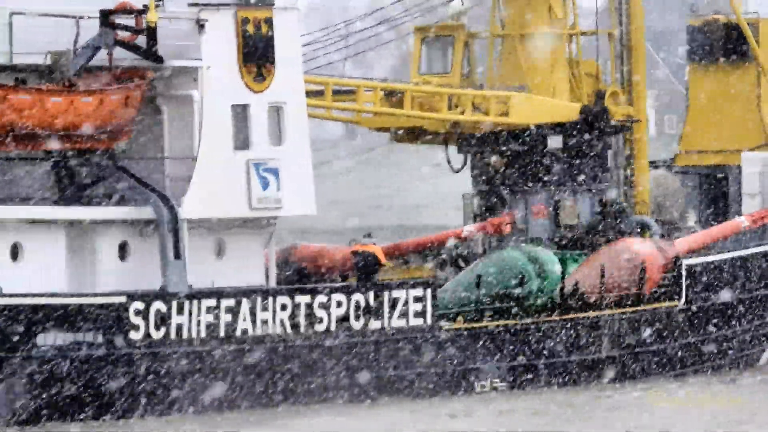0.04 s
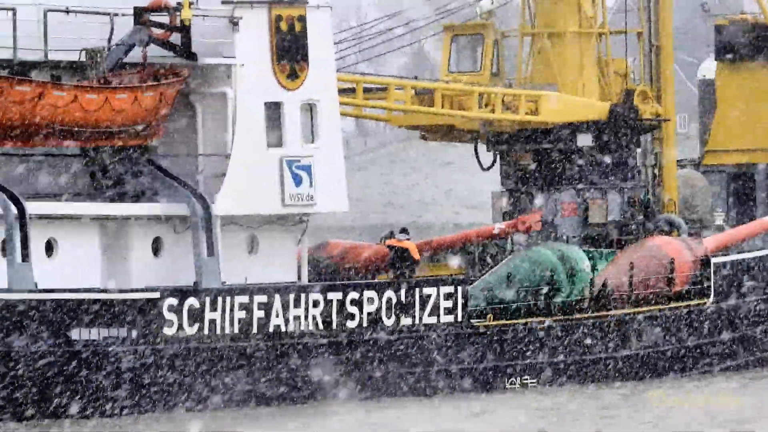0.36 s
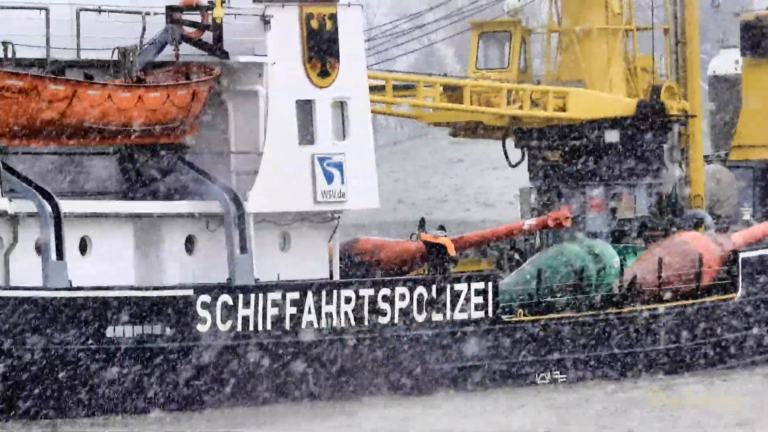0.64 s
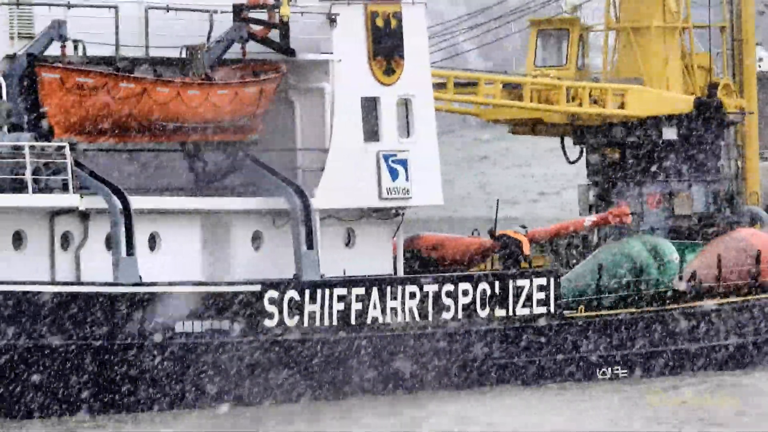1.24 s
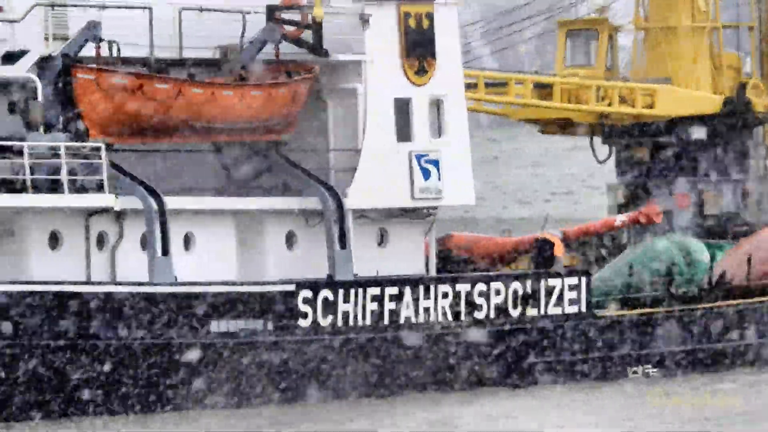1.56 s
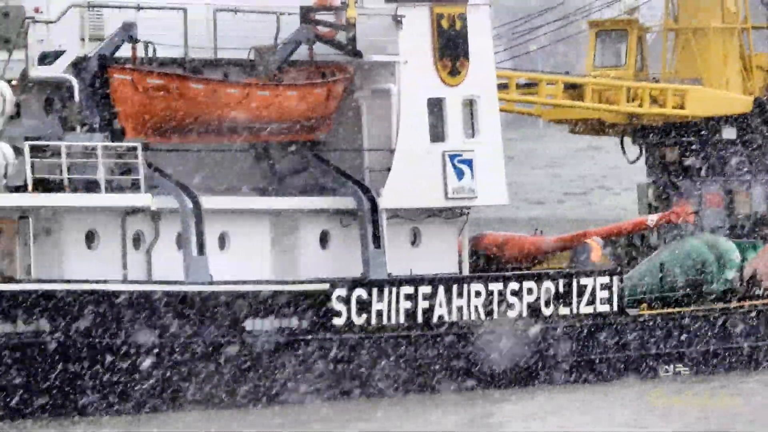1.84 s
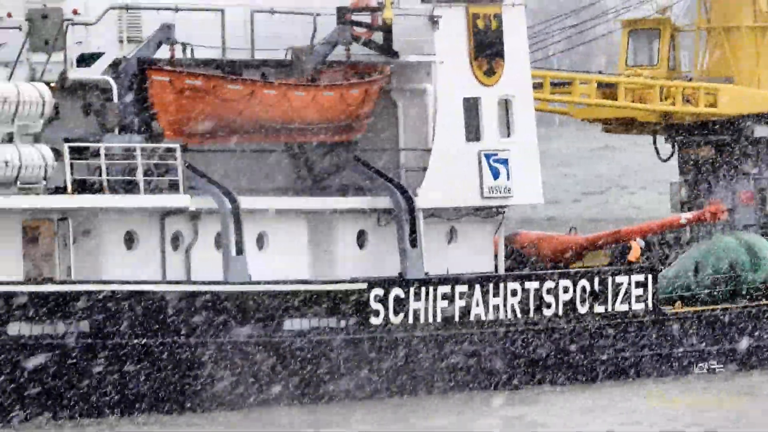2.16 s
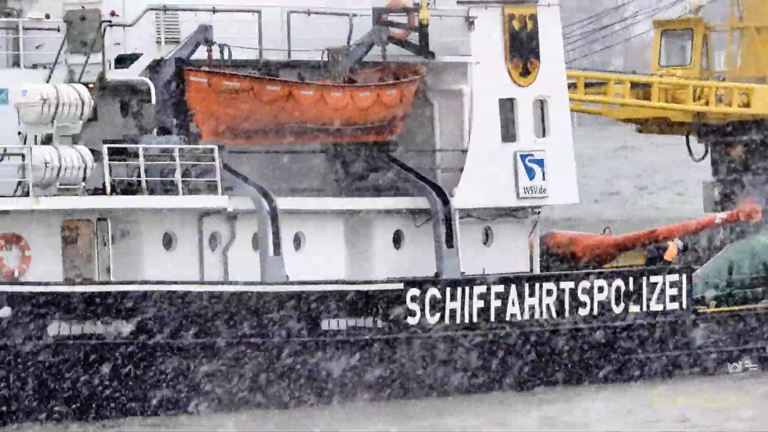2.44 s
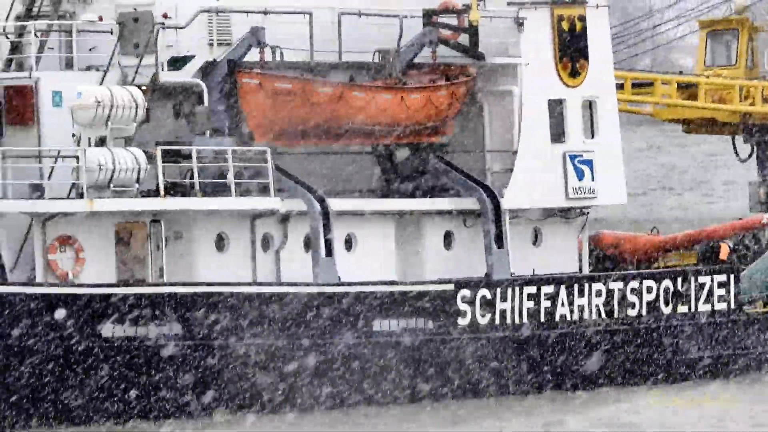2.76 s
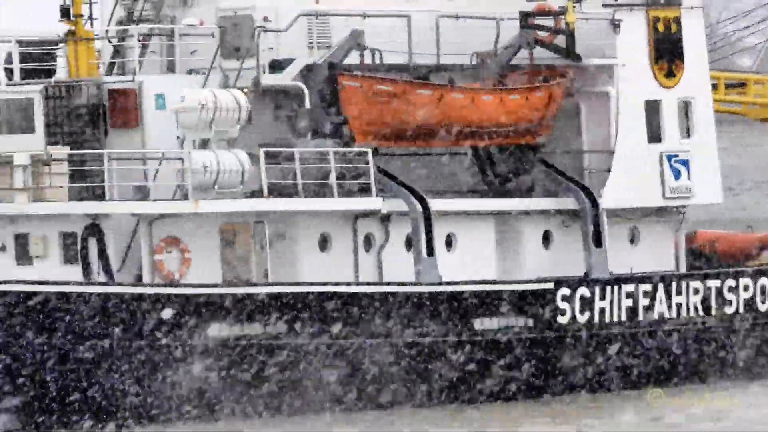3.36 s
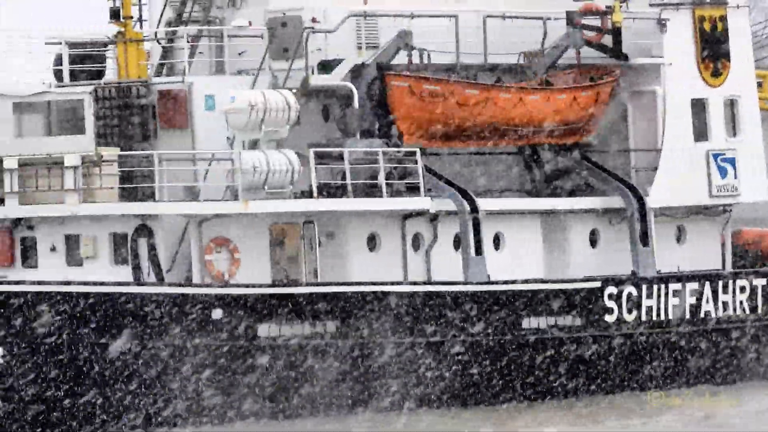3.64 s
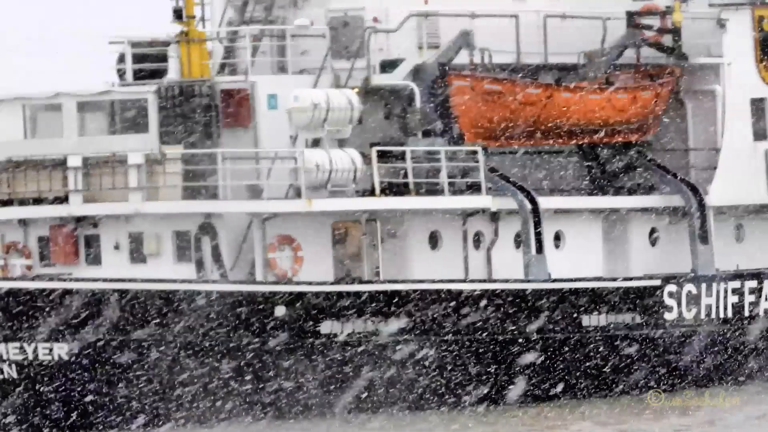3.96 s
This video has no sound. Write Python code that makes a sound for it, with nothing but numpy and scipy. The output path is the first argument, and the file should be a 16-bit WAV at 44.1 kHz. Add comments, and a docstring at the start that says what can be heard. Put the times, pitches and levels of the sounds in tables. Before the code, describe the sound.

Gusty wind rumbles and slaps against the microphone, with soft snow hiss behind it.

```python
"""Strong wind buffets a microphone at a harbour in driving snow, while a ship slides past.
Eddies shake the microphone with a deep rumble; the fastest tear into short, brighter flurries and slaps,
and gusts draw hollow hoots from the housing. Behind them lie the ship's dull wash and a soft rush of
wind over water that swells and sinks. Snow hisses, and icy grains tick on the housing.
A quick limiter holds down the hardest buffets."""
import sys
import numpy as np
from scipy import signal
from scipy.fft import rfft, irfft
from scipy.io import wavfile
from scipy.ndimage import uniform_filter1d

SR = 44100
rng = np.random.default_rng(int(sys.argv[2]) if len(sys.argv) > 2 else 0)


def master_out(mix):
    """Clip the mix to full scale and print it as 16-bit PCM to the path in sys.argv[1]."""
    frames = np.transpose(np.atleast_2d(mix))
    ceiling = np.clip(frames, -1, 1)
    pcm = np.round(ceiling * 32767).astype(np.int16)
    wavfile.write(sys.argv[1], SR, pcm)


N = 176400


def amp(db):
    """Decibels to gain."""
    return 10 ** (np.asarray(db) / 20)


def unit(x):
    """Scales to rms 1."""
    return x / np.sqrt(np.mean(x ** 2) + 1e-20)


def fader(points):
    """Gain at every sample from (t/s, level/dB) points."""
    return amp(np.interp(np.arange(N) / SR, *np.transpose(points)))


def colour(x, points, shift=1):
    """EQ through (f/Hz, level/dB) points, their frequencies times shift; steep beyond both ends."""
    f, db = np.transpose(points)
    hz = np.maximum(np.fft.rfftfreq(len(x), 1 / SR) / shift, 1)
    curve = amp(np.interp(np.log(hz), np.log(f), db))
    skirts = np.minimum(hz / f[0], 1) ** 2 * np.minimum(f[-1] / hz, 1) ** 6
    return irfft(rfft(x) * curve * skirts, len(x))


def lowpass(x, hz, order):
    """Smooth low-pass without delay."""
    f = np.fft.rfftfreq(len(x), 1 / SR)
    return irfft(rfft(x) / (1 + (f / hz) ** (2 * order)), len(x))


def wander(rate_hz, size):
    """Random modulation of rms 1, rolled off above the rate."""
    return unit(lowpass(rng.standard_normal(size), rate_hz, order=2))


def steadied(x, seconds):
    """Irons the slow swells out of a noise, leaving it near rms 1."""
    power = lowpass(x ** 2, 1 / (2 * seconds), order=1)
    return x / np.sqrt(np.abs(power) + 1e-12)


def impulses(levels_db, per_s):
    """Randomly timed one-sample spikes of either polarity."""
    return amp(levels_db) * rng.choice([-1, 1], N) * (rng.random(N) < per_s / SR)


def patchy(x, depth_db=3, patch_hz=600, patch_s=0.03):
    """Makes a hiss flicker in patches of time and pitch, at rms 1."""
    spectra = signal.stft(x, nperseg=512)[2]
    bins = len(spectra)
    flicker = rng.standard_normal(spectra.shape)
    flicker = uniform_filter1d(flicker, round(patch_hz * 2 * bins / SR), axis=0)
    flicker = uniform_filter1d(flicker, round(patch_s * SR / bins), axis=1)
    return unit(signal.istft(spectra * amp(depth_db * unit(flicker)))[1][:N])


def gust_envelope(t, length, attack_s=0.0056, release_s=0.0034):
    """Quick attack, hold and quick release."""
    ramps = np.clip(t / attack_s, 0, 1) * np.clip((length - t) / release_s, 0, 1)
    return np.sin(np.pi / 2 * ramps) ** 2


def add(mix, start_s, sound):
    """Mixes a sound in at its cue."""
    part = mix[max(round(start_s * SR), 0):][:len(sound)]
    part += sound[:len(part)]


# Fader ride of the buffeting wind: t/s, level/dB
RUMBLE_RIDE = [(0.0, -23.5), (0.03, -27.5), (0.08, -21.5), (0.12, -33.5), (0.14, -23), (0.5, -24),
               (0.52, -19), (0.54, -33.5), (0.6, -26), (0.96, -26), (1.0, -31), (1.05, -30.5),
               (1.07, -23.5), (1.51, -25), (1.56, -22.5), (1.74, -28.5), (1.88, -25), (1.95, -28.5),
               (2.28, -25), (2.32, -32.5), (2.49, -26), (2.58, -23.5), (2.63, -23.5), (3.27, -23.5),
               (3.35, -30.5), (3.39, -28.5), (3.69, -24), (4.0, -28.5)]
# Bass-heavy EQ of the rumble: f/Hz, level/dB
RUMBLE_EQ = [(18, -17.5), (28, -5.5), (43, 1), (70, -1), (110, -4), (170, -7.5), (260, -11), (340, -22),
             (420, -26), (540, -32.5), (700, -40), (1000, -54.5)]
# Boost or cut of its sub-bass: t/s, level/dB
SUB_RIDE = [(0.0, 0), (0.7, -5.5), (1.3, -3.5), (1.65, -4.5), (1.9, 5.5), (2.28, 1), (2.6, -1), (3.3, -1),
            (3.9, 2)]


def rumble(flutter_db=1.5, flurry_lift_db=1.5, trim_db=3):
    """Turbulent pressure shakes the microphone; the upper band flutters as small eddies pass."""
    air = colour(rng.standard_normal(N), RUMBLE_EQ)
    lows = lowpass(air, hz=310, order=3)
    flutter = unit(amp(flutter_db * wander(rate_hz=42, size=N)))
    air = steadied(lows + (air - lows) * flutter, seconds=0.085)
    air += (fader(SUB_RIDE) - 1) * lowpass(air, hz=61.5, order=2)
    in_flurry = np.zeros(N)
    for start, length, _, _ in FLURRY_CUES:
        add(in_flurry, start, gust_envelope(np.arange(0, length, 1 / SR), length))
    lift_db = flurry_lift_db * lowpass(in_flurry, hz=30, order=2)
    return amp(trim_db + lift_db) * fader(RUMBLE_RIDE) * air


# Dark EQ of the ship's wash: f/Hz, level/dB
SHIP_EQ = [(150, 5.5), (500, -1.5), (800, -5.5), (1150, -10), (1500, -19.5), (2500, -30)]


def ship(level_db=-46.5):
    """Engine and bow wash blur into one even, dull bed at this distance."""
    return amp(level_db) * unit(colour(rng.standard_normal(N), SHIP_EQ))


# Swells of the distant rush: t/s, level/dB
RUSH_RIDE = [(0.03, -65), (0.34, -66), (0.37, -68), (0.66, -56), (0.73, -61), (0.85, -56), (1.05, -57.5),
             (1.09, -62.5), (1.59, -62.5), (1.61, -68.5), (1.85, -56), (1.86, -61), (2.29, -62.5),
             (2.54, -50.5), (2.56, -57), (2.79, -66.5), (2.9, -62), (3.31, -70), (3.52, -58), (3.69, -55.5),
             (3.71, -59), (3.82, -58.5), (3.97, -58.5)]
# Its soft midrange EQ: f/Hz, level/dB
RUSH_EQ = [(400, -6.5), (800, -4), (1300, -1.5), (2000, -2.5), (2900, -6.5), (4000, -12.5), (6000, -21.5),
           (8000, -45)]


def rush(ripple_db=1.0, trim_db=1.5):
    """Distant wind over the water swells and sinks, with a fast ripple in its level."""
    ripple = amp(ripple_db * wander(rate_hz=39, size=N))
    air = unit(colour(rng.standard_normal(N), RUSH_EQ))
    return amp(trim_db) * fader(RUSH_RIDE) * ripple * air


# Fader ride of the driving snow: t/s, level/dB
SNOW_RIDE = [(0.03, -73), (0.28, -76), (0.54, -79), (0.65, -76), (1.04, -77.5), (1.1, -72.5), (1.59, -73.5),
             (1.61, -78), (1.74, -70.5), (2.19, -71), (2.34, -78), (2.43, -73), (2.59, -76.5), (3.04, -73),
             (3.26, -83), (3.51, -70), (3.87, -67.5), (3.97, -71.5)]
# Its thin, bright EQ: f/Hz, level/dB
SNOW_EQ = [(1500, -9.5), (3000, 0.5), (4200, -.5), (5600, -2), (6800, -3), (7600, -8), (8100, -14),
           (8600, -23), (11000, -26.5), (15000, -29.5)]


def snow(spread_db=5, grains_db=-9, trim_db=8):
    """Driving snow: a fine hiss with countless tiny impacts in it."""
    grains = impulses(spread_db * np.minimum(rng.exponential(1, N), 4), per_s=300)
    patter = rng.standard_normal(N) + amp(grains_db) * unit(grains)
    return amp(trim_db) * fader(SNOW_RIDE) * patchy(colour(patter, SNOW_EQ))


# Low-mid EQ of an eddy, for puffs and flurries alike: f/Hz, level/dB
EDDY_EQ = [(90, -15.5), (200, 2.5), (280, 3), (450, -3), (600, -8.5), (700, -14), (850, -20.5),
           (1000, -29.5), (1400, -38.5), (2200, -59)]


def puffs(level_db=-41, spread_db=2.5):
    """Tiny eddies pop against the microphone at random."""
    pops = impulses(spread_db * rng.uniform(-2.1, 1, N), per_s=22)
    return amp(level_db) * unit(colour(pops, EDDY_EQ))


# Top-end EQ of fine ice flecks and of the microphone's hiss: f/Hz, level/dB
SPATTER_EQ = [(4000, 0.5), (7000, 0), (9000, -1), (12000, -8.5), (15000, -20)]


def spatter(clicks_db=-85.5, spread_db=4, mic_hiss_db=-88):
    """Flecks of ice click on the housing, over a faint, steady high hiss of the microphone."""
    flecks = impulses(spread_db * rng.uniform(-0.83, 1, N), per_s=40)
    clicks = unit(colour(flecks, SPATTER_EQ))
    mic_hiss = patchy(colour(rng.standard_normal(N), SPATTER_EQ))
    return amp(clicks_db) * clicks + amp(mic_hiss_db) * mic_hiss


# Fast eddies tearing at the microphone: t/s, length/s, level/dB, EQ shift/octaves
FLURRY_CUES = [(0.236, 0.038, -26.5, -0.13), (0.498, 0.017, -31.5, 0.083), (0.535, 0.022, -25.5, -0.083),
               (0.691, 0.034, -18.5, 0.066), (0.722, 0.044, -23.5, -0.23), (0.767, 0.024, -20, -0.36),
               (.807, 0.052, -23.5, -0.27), (0.906, 0.034, -23, -0.035), (0.981, 0.024, -30.5, 0.59),
               (1.027, 0.015, -19, -0.0052), (1.258, 0.016, -19.5, -1.01), (1.532, 0.038, -20, -0.77),
               (1.841, 0.062, -28, 0.23), (1.925, 0.049, -36, 0.3), (1.975, 0.068, -29, 0.17),
               (2.132, 0.053, -35, 0.23), (2.192, 0.037, -27.5, -0.3), (2.258, 0.01, -31, 0.05),
               (2.283, 0.017, -32, 0.11), (2.465, 0.016, -28, -0.3), (2.546, 0.03, -20.5, 0.24),
               (2.58, 0.02, -19.5, 0.55), (2.597, 0.017, -23, 0.05), (2.627, 0.062, -24, -0.48),
               (3.385, 0.066, -31, 0.38), (3.677, 0.031, -28.5, 0.24), (3.756, 0.044, -29, 0.35),
               (3.791, 0.039, -27, 0.57), (3.883, 0.057, -26.5, 0.34), (3.937, 0.076, -28.5, 0.25)]


def flurries(tear_db=3.5, sag_db=-6.5, trim_db=0.5):
    """Each fast eddy is a short, ragged burst that hits at once and sags."""
    out, size = np.zeros(N), 2 ** 13
    t = np.arange(size) / SR
    for start, length, db, octaves in FLURRY_CUES:
        air = colour(rng.standard_normal(size), EDDY_EQ, shift=2 ** octaves)
        tear = amp(tear_db * wander(rate_hz=134, size=size))
        burst = steadied(air * tear, seconds=0.054)
        envelope = gust_envelope(t, length) * amp(sag_db * np.minimum(t / length, 1))
        add(out, start, amp(db + trim_db) * envelope * burst)
    return out


# Hits of the larger snow grains: t/s, peak level/dB, f/Hz, width/octaves
TICK_CUES = [(.513, -64, 7650, 0.48), (1.915, -54.5, 6800, 0.15), (2.319, -46, 4750, 0.26),
             (2.433, -62, 7200, .18), (2.504, -40, 3700, .33), (3.84, -51, 7100, 0.16),
             (3.871, -47, 4800, .35), (3.906, -55, 7100, .16)]


def ticks(attack_s=0.0012, decay_s=0.0047):
    """Icy grains strike the housing: a dry, narrow-band tick each."""
    out, size = np.zeros(N), 2 ** 10
    t = np.arange(size) / SR
    hz = np.fft.rfftfreq(size, 1 / SR) + 1
    envelope = np.minimum(t / attack_s, 1) * np.exp(-np.maximum(t - attack_s, 0) / decay_s)
    for start, db, centre_hz, octaves in TICK_CUES:
        band = np.exp(-0.5 * (np.log2(hz / centre_hz) / octaves) ** 2)
        tick = envelope * irfft(rfft(rng.standard_normal(size)) * band)
        add(out, start, amp(db) * tick / np.abs(tick).max())
    return out


# Single eddies slapping the microphone: centre t/s, level/dB, f/Hz
SLAP_CUES = [(0.7032, -27, 374), (0.7758, -15, 280), (0.9226, -14.5, 227), (0.9394, -12, 300),
             (0.985, -8.5, 336), (1.044, -8.5, 338), (1.5384, -21, 280), (2.0015, -20, 553),
             (2.1232, -15.5, 380), (2.14, -22.5, 279), (2.2014, -14.5, 423), (2.288, -25, 300),
             (2.5757, -5, 397), (2.639, -15, 280), (3.7645, -21, 440), (3.8433, -9.5, 380),
             (3.9229, -17, 470), (3.9415, -19, 400)]


def slaps(width_cycles=0.33, trim_db=-1.5):
    """A single eddy is one quick push and pull of the air."""
    out, t = np.zeros(N), np.arange(-0.015, 0.015, 1 / SR)
    for centre, db, hz in SLAP_CUES:
        swing = np.cos(2 * np.pi * (hz * t + rng.random())) / np.cosh(hz * t / width_cycles)
        add(out, centre + t[0], amp(db + trim_db) * swing)
    return out


# Hollow hoots of the housing: t/s, length/s, level/dB, f/Hz
HOOT_CUES = [(0.986, 0.021, -24, 464), (1.853, 0.033, -30, 492), (1.925, 0.023, -29, 466),
             (1.978, 0.03, -30, 587), (2.199, 0.012, -28.5, 483), (2.548, 0.016, -22, 501)]


def hoots(waver=0.1, trim_db=-4.5):
    """A gust crosses the hollow of the housing, which resonates for a few unsteady cycles."""
    out = np.zeros(N)
    for start, length, db, hz in HOOT_CUES:
        t = np.arange(0, length, 1 / SR)
        pitch = hz * (1 + waver * wander(rate_hz=120, size=8192)[:len(t)])
        tone = np.sin(2 * np.pi * (np.cumsum(pitch) / SR + rng.random()))
        add(out, start, amp(db + trim_db) * unit(gust_envelope(t, length) * tone))
    return out


def scene():
    """Mono mix: wind on the microphone up front; ship, rush and snow behind; close detail on top."""
    wind = rumble() + flurries()
    backdrop = ship() + rush() + snow()
    detail = ticks() + puffs() + slaps() + hoots() + spatter()
    return (wind + backdrop + detail)[None]


def record(dry, threshold_db=-10, ratio=11, release_db_per_s=152.5, cutoff_hz=15700):
    """A quick limiter holds down the hardest buffets; then click-free ends and a high cut."""
    t = np.arange(N) / SR
    peak_db = 20 * np.log10(np.abs(dry[0]) + 1e-9)
    fall_db = t * release_db_per_s
    envelope_db = np.maximum.accumulate(peak_db + fall_db) - fall_db  # jumps to a peak, then sinks
    over_db = np.maximum(envelope_db - threshold_db, 0)
    smooth_db = uniform_filter1d(uniform_filter1d(over_db, size=160), size=160)
    limited = dry / amp((1 - 1 / ratio) * smooth_db)
    fades = np.minimum(np.minimum(t, t[::-1]) / 0.002, 1)
    high_cut = signal.firwin(255, cutoff_hz, window=("kaiser", 8), fs=SR)
    return signal.oaconvolve(limited * fades, high_cut[None], "same")


dry = scene()
out = record(dry)
master_out(out)
```